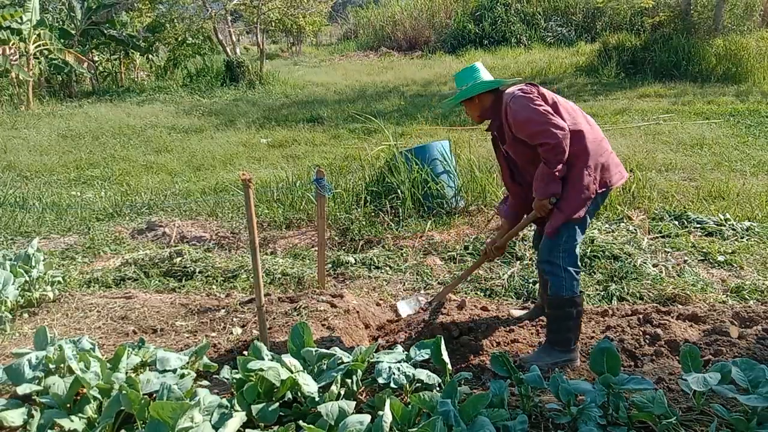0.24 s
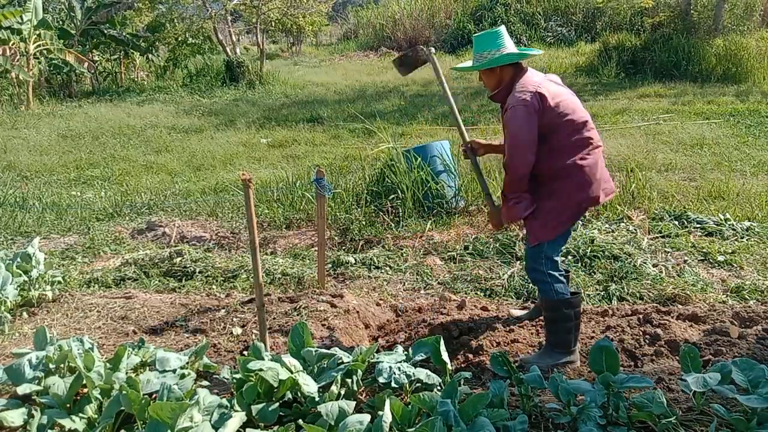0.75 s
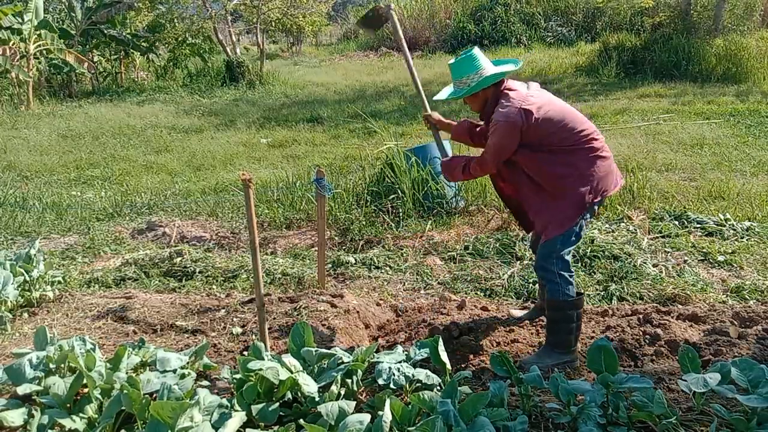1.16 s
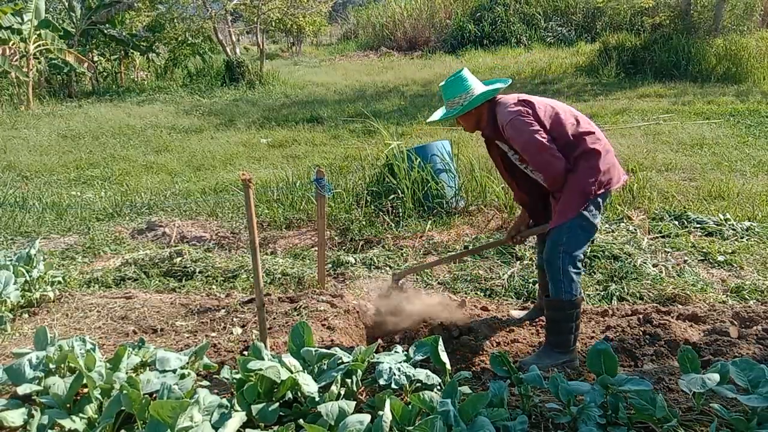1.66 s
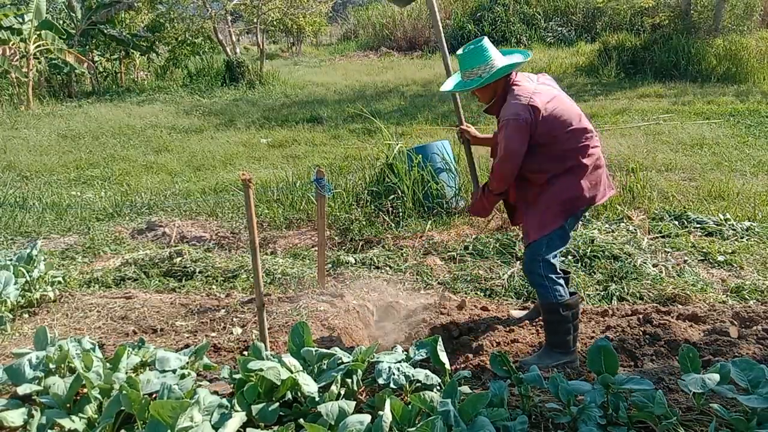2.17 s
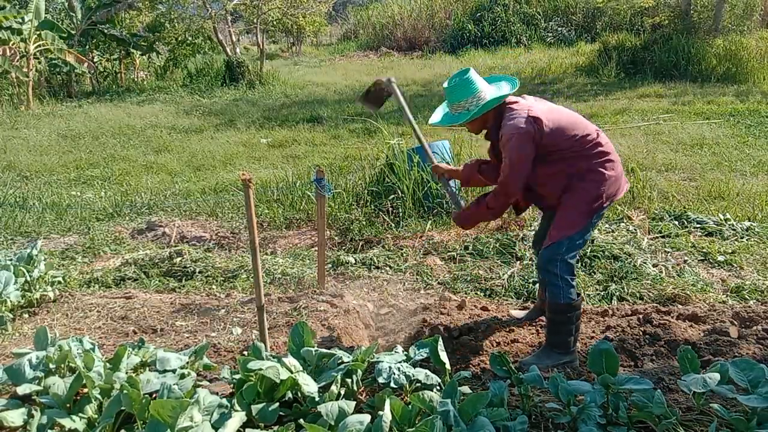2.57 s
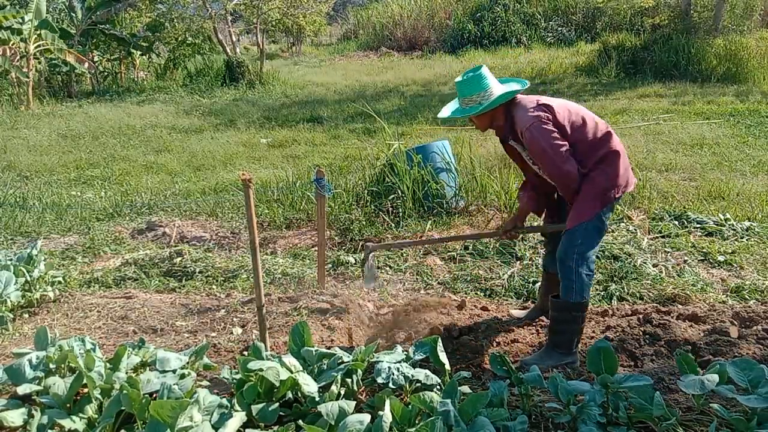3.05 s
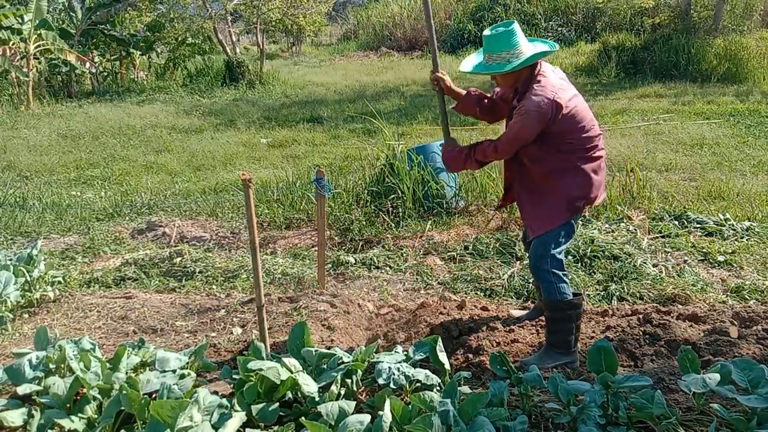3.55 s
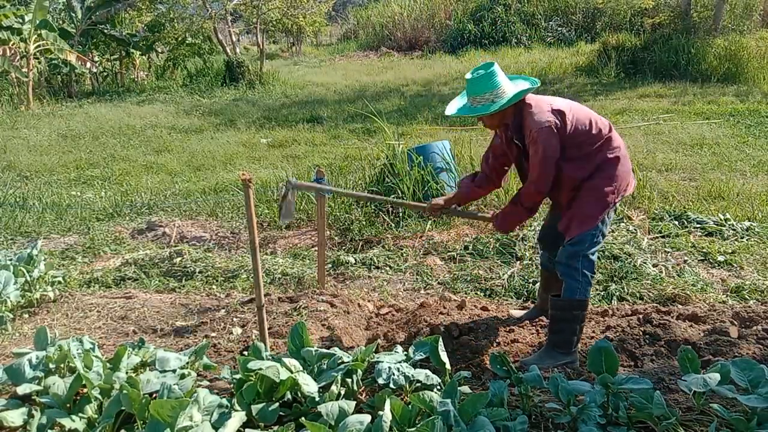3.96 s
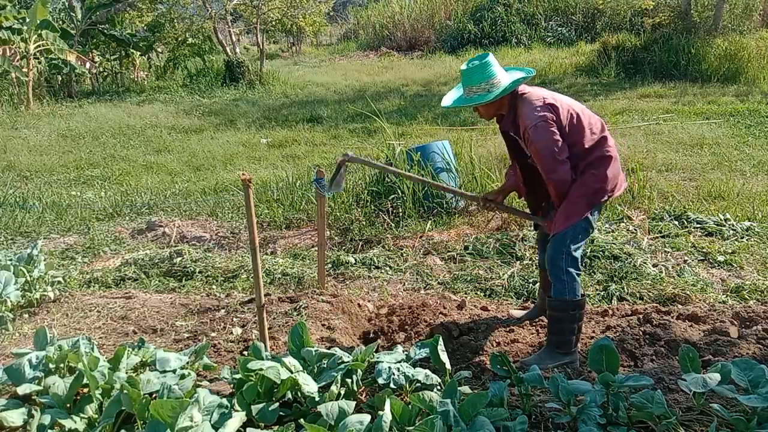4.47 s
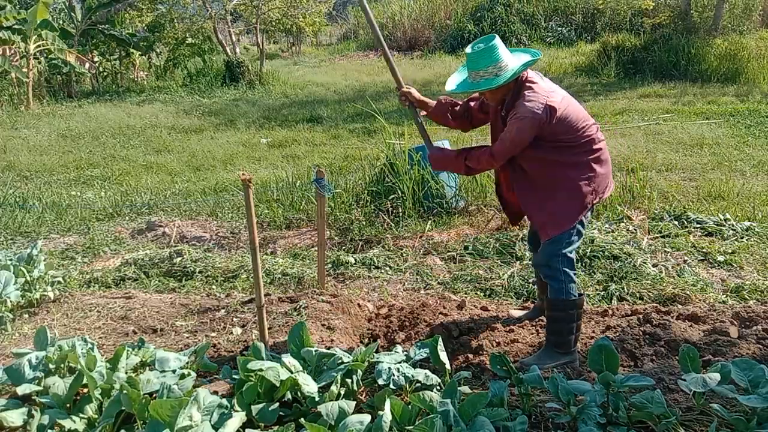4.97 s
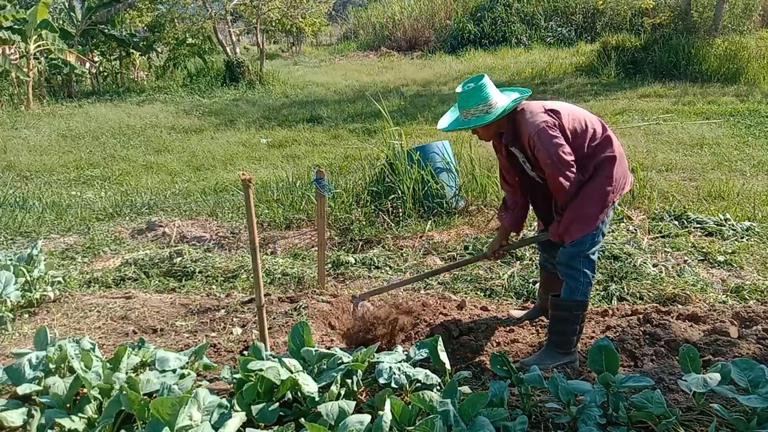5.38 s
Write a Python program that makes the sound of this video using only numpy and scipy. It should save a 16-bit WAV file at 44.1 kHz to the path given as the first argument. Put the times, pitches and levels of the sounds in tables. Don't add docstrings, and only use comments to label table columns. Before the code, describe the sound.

Wind buffets and leaf hiss open the scene, with a thin high insect hiss and distant droning engine that soon fade. Then a metal hoe bites dry earth: a dull chop, a sharp ringing one, and two crisp, gritty ones, each followed by trickling soil. A far pump whines unsteadily and a sprinkler spits. The open-air microphone stands several metres off, its background level pulsing with automatic gain.

```python
import sys
import numpy as np
from scipy import signal
from scipy.fft import rfft, irfft, next_fast_len
from scipy.io import wavfile
from scipy.ndimage import uniform_filter1d

SR = 44100
rng = np.random.default_rng(int(sys.argv[2]) if len(sys.argv) > 2 else 0)


def unload_audio(sound):
    columns = np.transpose(np.atleast_2d(sound))
    steps = np.round(np.clip(columns, -1, 1) * 32767)
    wavfile.write(sys.argv[1], SR, steps.astype(np.int16))


def to_linear_factor(level_db):
    exponent = np.asarray(level_db, float) / 20
    return 10 ** exponent


N = 247842
T = np.arange(N) / SR
COARSE = T[::32]
PIVOT_DB = -62

# pitch_hz, level_db
INSECT_COLOUR = [(13300, -19), (14300, -9), (15000, -5), (16000, -7)]
TRAFFIC_COLOUR = [(230, -25), (420, -11), (700, 0), (1000, -1.5), (1300, -11)]
PUMP_SKIRT_COLOUR = [(900, -29), (1080, 12.5), (1250, 6), (1500, -8), (1700, -18.5)]
# pitch_hz, level_db
LOW_LEAVES_COLOUR = [(900, -20.5), (1300, -3.5), (1650, -4.5), (2100, -4), (2700, -5), (3300, -12.5),
                     (3900, -27)]
HIGH_LEAVES_COLOUR = [(2900, -18), (3600, -4), (4600, -4.5), (5600, -4.5), (6200, -16), (6900, -31)]
RUSTLE_COLOUR = [(5500, -15), (6900, 0.5), (8200, -8), (10300, -7.5), (13400, -12.5), (14500, -9),
                 (16000, -1.5)]
RASP_COLOUR = [(1050, -21), (1300, -4), (1550, 2), (1800, -3.5), (2100, -24.5)]
# pitch_hz, level_db
RUMBLE_COLOUR = [(12, -50), (20, -33.5), (65, 6.5), (141, -3), (248, -21.5), (325, -32.5), (352, -26),
                 (403, -23.5), (500, -34.5), (650, -68.5), (1100, -120)]
GROWL_COLOUR = [(130, -20.5), (200, 1.5), (300, -5), (420, -16), (600, -31.5)]
# pitch_hz, level_db
SLIDE_COLOUR = [(600, -23.5), (900, -4.5), (1600, 0.5), (2500, -0.5), (3300, -7.5), (4200, -26.5)]
CRUMB_COLOUR = [(180, -37), (300, -4.5), (876, -15), (1230, -3), (1460, -1.5), (3810, -0.5), (4310, -6.5),
                (5910, -8), (8000, -26), (10400, -56.5), (17600, -120)]
SAND_COLOUR = [(5500, -18), (7000, 15.5), (8200, 6.5), (10300, 6.5), (13300, -7), (14700, 2.5),
               (16000, -4.5)]

# time_s, level_db
BREEZE = [(0.0, -57), (0.47, -53), (0.83, -62), (1.49, -64), (1.97, -68.5), (2.55, -67), (2.8, -67),
          (3.22, -69.5), (4.33, -70), (4.43, -64.5), (4.65, -71.5), (4.84, -68.5), (5.31, -69.5),
          (5.62, -65.5)]
# time_s, level_db
CARRY = [(0, -55.5), (.13, -54), (.42, -59.5), (.7, -62), (1.02, -63.5), (1.45, -60), (1.6, -60),
         (1.95, -51), (2.45, -57), (2.75, -50), (3.25, -59.5), (3.7, -54.5), (3.88, -61), (3.95, -68.5),
         (4.4, -62), (4.5, -62), (4.68, -66), (5.62, -69)]
# time_s, change_db, half_width_ms
PUMP_SWELLS = [(.12, 5, 27), (.28, 6.5, 54), (.41, 12.5, 29), (.62, 4.5, 43), (1.62, 6, 74), (1.83, 1, 50),
               (2.0, 1, 28), (2.15, 4.5, 81), (2.31, 5, 35), (2.52, 3, 33), (2.66, 4.5, 54),
               (2.99, -10, 27), (3.16, 6, 79), (3.26, -8, 25), (3.36, 7, 36), (3.5, 4, 100), (3.62, -9, 19),
               (3.7, 5.5, 40), (3.86, 7.5, 60), (4.021, 4.5, 43), (4.3, 3, 25), (4.7, 4.5, 50),
               (4.999, 0, 81), (5.32, 2, 30)]
# time_s, level_db
ENGINE_LEVEL = [
    (0, -82),
    (.3, -76),
    (.45, -71.5),
    (1.0, -71.5),
    (1.2, -78),
    (1.6, -86),
    (2.2, -82),
    (2.6, -87),
    (5.62, -92),
]
# pitch_hz, level_db
ENGINE_TONES = [
    (183, -3),
    (366, 8.5),
    (403, 8),
    (438, 3.5),
]
# time_s, level_db
SPURTS = [(.95, -57.5), (1.109, -55.5), (1.276, -54.5), (1.44, -61.5), (1.605, -68), (1.77, -65),
          (1.934, -57.5), (2.105, -66), (2.27, -63), (2.435, -68), (2.605, -61), (3.11, -66),
          (3.445, -63.5), (3.605, -62), (3.779, -59.5), (3.94, -64.5), (4.275, -65), (4.445, -63),
          (4.774, -62.5), (4.945, -66), (5.108, -66.5), (5.6, -62.5)]
# start_s, length_s, level_db
GUSTS = [(0, 0.099, -45.5), (0.1, 0.38, -43), (0.472, 0.14, -45), (0.671, .13, -46), (0.838, 0.033, -36),
         (0.924, 0.1, -40), (1.046, 0.14, -55), (1.146, 0.25, -37), (1.302, 0.22, -35), (1.55, 0.14, -35.5),
         (1.718, .18, -42), (1.965, 0.1, -47), (2.204, 0.043, -38), (2.279, 0.078, -45), (2.445, 0.11, -47),
         (2.567, 0.1, -41), (2.787, 0.13, -43.5), (3.096, 0.25, -43.5), (3.19, 0.1, -30.5),
         (3.306, 0.28, -27), (3.637, 0.14, -32.5), (3.77, .12, -42.5), (3.883, 0.074, -54),
         (4.104, 0.11, -36.5), (4.298, 0.048, -47), (4.363, 0.16, -45.5), (4.673, 0.23, -48),
         (4.917, 0.34, -44), (5.336, 0.27, -47), (5.517, .1, -44)]
# time_s, peak_db, pitch_hz, length_ms
BUFFETS = [(0.016, -28.5, 158, 5.2), (0.127, -38, 129, 8.5), (0.15, -30, 140, 2.4), (0.171, -18.5, 135, 6),
           (0.172, -25.5, 307, 4.9), (0.222, -37, 120, 11), (0.298, -35, 200, 2.9), (0.338, -29.5, 127, 5),
           (0.359, -29.5, 127, 24), (0.555, -32.5, 115, 9.4), (0.854, -25.5, 111, 7.3),
           (1.158, -19.5, 135, 3), (1.222, -27.5, 165, 4.1), (1.242, -30, 121, 4.7), (1.305, -35, 139, 3),
           (1.35, -29.5, 150, 4), (1.385, -28, 129, 13), (1.461, -27.5, 144, 5.6), (1.522, -34, 130, 5.2),
           (1.58, -47, 109, 9.1), (1.607, -31.5, 165, 4.1), (1.631, -25, 178, 3.6), (1.738, -21, 150, 6.9),
           (1.742, -36, 288, 5.7), (2.035, -23, 116, 4), (2.309, -36, 107, 5.7), (2.626, -28.5, 96, 23),
           (3.03, -58, 297, 16), (3.137, -37, 150, 7.4), (3.155, -33.5, 160, 5.3), (3.208, -25.5, 191, 3.2),
           (3.218, -23.5, 112, 15), (3.24, -32, 150, 3.5), (3.319, -18.5, 243, 1.76),
           (3.327, -26, 140, 5.5), (3.357, -18, 130.5, 12.5), (3.378, -25, 250, 1.8), (3.42, -31, 150, 5.5),
           (3.428, -18, 188, 5), (3.445, -34, 197.6, 6.1), (3.463, -14, 149, 4.5), (3.478, -15.5, 157, 2.9),
           (3.507, -22, 156, 8.5), (3.535, -27.5, 157, 9), (3.649, -25, 170, 3.1), (3.666, -19.5, 107, 8.9),
           (3.726, -28.5, 109.5, 15.4), (4.194, -30, 130, 5.7), (4.208, -32.5, 126, 4),
           (4.428, -26.5, 115, 3.8), (4.455, -32, 98, 11), (4.81, -33.5, 112, 9)]
# start_s, level_db, fade_ms
SLIDES = [(1.569, -52, 34), (1.663, -52.5, 35), (1.735, -52.5, 17), (1.784, -54, 66), (1.85, -57, 20),
          (1.904, -58, 26), (2.239, -55, 32), (2.631, -65, 49), (3.089, -58.5, 60), (3.671, -59, 40),
          (3.761, -66, 51), (4.368, -59.5, 140), (4.66, -68, 300), (5.5, -72, 50)]
# start_s, crumbs_db, crumbs_t60_s, sand_db, singing_blade_db
CHOPS = [
    (1.481, -34.5, 0.13, -42, -77),
    (2.807, -35.5, 0.24, -32, -42),
    (4.1142, -34, 0.22, -35, -68),
    (5.352, -38.5, 0.3, -37, -47),
]
# start_s, level_db, rise_s
THUDS = [
    (1.481, -36.5, 0.0085),
    (2.811, -34, 0.0072),
    (4.123, -37.5, 0.013),
    (5.357, -37, 0.0097),
]
BLADE_HZ = [890, 1255, 1870, 2632, 3490, 3818, 4830, 5005, 5750, 5975, 6560, 7280, 10310, 14630]
# level_db, t60_s
BLADE_RING = [(-17.5, 0.0054), (3, 0.028), (-6, 0.027), (-4, 0.043), (-8, 0.03), (1.5, 0.029), (0, 0.018),
              (-12.5, .035), (-4, 0.02), (-10, 0.047), (-5.5, 0.034), (-24.5, 0.049), (-7.5, 0.032),
              (-13, .03)]
# start_s, peak_db, brightness_hz, decay_ms, ring_db
CONTACTS = [(1.4828, -22.5, 1410, 8.7, 0), (1.4852, -25.5, 4450, 7.5, -19), (1.4868, -25, 2660, 1.2, -20),
            (1.4902, -26.5, 2340, 1.1, -20), (1.4965, -26, 1280, 2.6, -17), (1.5025, -31, 2590, 2.5, -21),
            (1.5075, -33, 910, 3.5, -41), (1.519, -40, 2670, 3, -13), (1.571, -42.5, 1280, 5, -2),
            (1.5715, -55, 2700, 4, -12), (2.8079, -1.5, 3300, 2.6, 6), (2.8111, -7.5, 2980, 2.2, 8.5),
            (2.8175, -21, 5700, 1.3, -22), (2.8275, -25, 940, 2.8, -25), (2.831, -31, 1820, 2.3, -11),
            (2.837, -26, 2530, 1.7, -13), (2.841, -28, 5880, 4, 11), (2.8495, -28, 3800, 2.2, -2),
            (2.863, -39, 4800, 3.2, 5), (2.926, -39, 2630, 5, 10), (4.1132, -22, 6600, 1.9, -16.5),
            (4.1157, -11, 5600, 0.4, -20), (4.1178, -29.5, 3430, 1.5, -9), (4.1205, -27.5, 3500, 2.4, 11),
            (4.125, -31, 5000, 1.5, -10), (4.1305, -18.5, 3900, 1, -12), (4.132, -21, 2860, 0.67, -2),
            (4.1362, -17, 3860, 0.81, 8), (4.137, -25, 2100, 1.9, 3), (4.1402, -23.5, 4300, 1.3, -18),
            (4.1425, -34, 2900, 1.1, -22), (5.3518, -8.5, 6600, 1.2, -8.5), (5.3526, -20, 5790, 1.13, -32),
            (5.3555, -24, 3000, 2.8, -5), (5.36, -36, 6300, 1.2, -20), (5.3652, -18, 2880, 2, -16),
            (5.366, -23, 7000, 1.2, -20), (5.372, -26, 2110, 1.5, -19), (5.3741, -15, 3800, 0.68, 0),
            (5.377, -23.5, 2100, 2.1, -13)]
# time_s, depth_db, half_width_ms
DUCKS = [(0.016, -4.5, 15), (0.182, -7.5, 22), (0.359, -9.5, 11.4), (0.524, -6, 12), (0.691, -5.5, 13),
         (0.853, -5.5, 23), (1.022, -5, 12), (1.182, -6.5, 6.2), (1.338, -3.5, 13), (1.74, -3.5, 21),
         (2.074, -9, 21.4), (2.234, -4, 15), (2.404, -11.5, 15.6), (2.6, -3, 30), (2.739, -7, 9.8),
         (3.079, -2, 21), (3.26, -1, 16), (3.429, -3, 28), (3.62, -2, 68), (4.482, -7, 7.1),
         (4.53, -6.5, 96), (5.29, -4, 23)]
# pitch_hz, width_hz, level_db
HOUSING = [
    (8070, 390, -9.5),
    (13700, 870, -2),
    (14900, 1600, 3),
]


def curve(table):
    return np.interp(T, *np.transpose(table))


def fine(slow):
    return np.interp(T, COARSE, slow)


def follow(db, offset_db, slope):
    return PIVOT_DB + offset_db + slope * (db - PIVOT_DB)


def unit(x):
    return x / abs(x).max()


def add(out, s, x):
    i = int(s * SR)
    out[max(i, 0):i + len(x)] += x[max(-i, 0):N - i]


def walk(rate):
    k = int(SR / rate)
    steps = np.repeat(rng.standard_normal(N // k + 1), k)[:N]
    y = uniform_filter1d(uniform_filter1d(steps, k), k)
    return y / y.std()


def grains(scatter_db):
    return rng.standard_normal(N) * to_linear_factor(scatter_db * rng.exponential(size=N))


def colour(x, spectrum):
    hz, db = np.transpose(spectrum)
    size = next_fast_len(N, True)
    bins = np.maximum(np.arange(size // 2 + 1) * SR / size, 1)
    gain = to_linear_factor(np.interp(np.log(bins), np.log(hz), db, left=-90, right=-90))
    y = irfft(rfft(x, size) * gain, size)[:N]
    return y / y.std()


def patchy(spectrum, spread_db, bins=3, frames=4, scatter_db=0):
    cells = signal.stft(grains(scatter_db), nperseg=512)[2]
    field = rng.standard_normal(cells.shape)
    field = uniform_filter1d(uniform_filter1d(field, bins, axis=0), frames, axis=1)
    noise = signal.istft(cells * to_linear_factor(spread_db * field / field.std()), nperseg=512)[1][:N]
    return colour(noise, spectrum)


def ring(x, hz, t60):
    pole = np.exp(2j * np.pi * hz / SR - np.log(1000) / (t60 * SR))
    return signal.lfilter([1], [1, -pole], x + 0j).imag


def ducking():
    dips = 0
    for s, db, ms in DUCKS:
        side = np.where(COARSE > s, 1.3, .8)
        dips = dips + db * np.exp(-(1000 * (COARSE - s) / ms * side) ** 2)
    return fine(dips)


def insect():
    fade = np.clip((1.45 - T) / .25 + .5, 0, 1)
    return to_linear_factor(-72 + 2.1 * walk(12.4)) * fade * colour(rng.standard_normal(N), INSECT_COLOUR)


def traffic():
    return to_linear_factor(follow(curve(CARRY), offset_db=-5, slope=0.55)) * patchy(TRAFFIC_COLOUR, 4.1)


def engine():
    turned_s = np.cumsum(1 + 0.0032 * walk(4.4)) / SR
    tones = sum(to_linear_factor(db + 2.3 * walk(27)) * np.sin(2 * np.pi * hz * turned_s) for hz, db in ENGINE_TONES)
    return to_linear_factor(curve(ENGINE_LEVEL)) * tones


def pump():
    pitch_hz, width_hz = 1250, 130
    k = int(SR / width_hz)
    flutter = uniform_filter1d(uniform_filter1d(rng.standard_normal((2, N)), k), k)
    phase = 2 * np.pi * pitch_hz * np.cumsum(1 + 0.023 * walk(12)) / SR
    whine = flutter[0] * np.cos(phase) + flutter[1] * np.sin(phase)
    whine = whine / whine.std() + to_linear_factor(-9) * patchy(PUMP_SKIRT_COLOUR, 4.6)
    swell_db = fine(sum(db * np.exp(-(1000 * (COARSE - s) / ms) ** 2) for s, db, ms in PUMP_SWELLS))
    return to_linear_factor(curve(CARRY) - 0.5 + swell_db + 1.4 * ducking()) * whine


def leaves():
    breeze_db = curve(BREEZE)
    near = to_linear_factor(follow(breeze_db, offset_db=0.37, slope=0.94))
    far = to_linear_factor(follow(curve(CARRY), offset_db=-6.5, slope=0.71))
    out = np.hypot(near, far) * patchy(LOW_LEAVES_COLOUR, 4.5)
    throb_db = 2.4 * np.cos(2 * np.pi * 5.94 * (T - .1)) * np.clip((.9 - T) / 0.083, 0, 1)
    rasp_db = follow(breeze_db, offset_db=-8.5, slope=1.97)
    out += to_linear_factor(rasp_db + throb_db) * patchy(RASP_COLOUR, 4.5)
    out += to_linear_factor(breeze_db + throb_db + 1.2 * walk(20)) * patchy(HIGH_LEAVES_COLOUR, 3.5)
    rustle_db = follow(breeze_db, offset_db=-9, slope=0.69)
    rustle = to_linear_factor(rustle_db + throb_db - 1.0) + to_linear_factor(-83)
    return out + rustle * to_linear_factor(1.1 * walk(34)) * patchy(RUSTLE_COLOUR, 2.7)


def sprinkler():
    jet = patchy(HIGH_LEAVES_COLOUR, 4.0) + to_linear_factor(-8.5) * colour(rng.standard_normal(N), RUSTLE_COLOUR)
    spurt_ms = 16.7
    return jet * fine(sum(to_linear_factor(db) * np.exp(-(1000 * (COARSE - s) / spurt_ms) ** 2) for s, db in SPURTS))


def gusts():
    calm_db, edge_s, arch_db, peak_at = -62, 0.024, -5.5, 0.4
    power = to_linear_factor(2 * calm_db)
    for s, length, db in GUSTS:
        nearest_end = np.minimum(COARSE - s, s + length - COARSE)
        shape = np.clip(nearest_end / edge_s + .5, 0, 1) ** 2
        arch = (2 * ((COARSE - s) / length - peak_at)).clip(-1, 1) ** 2
        power = power + shape * to_linear_factor(2 * (db + arch_db * arch))
    return fine(10 * np.log10(power))


def small_eddies(wind_db):
    gap_s = .023
    slot = np.arange(int(N / SR / gap_s) - 1)
    loud, pitch, length = rng.standard_normal((len(slot), 3)).T
    place = (slot + rng.random(len(slot))) * gap_s
    peak_db = wind_db[(place * SR).astype(int)] + 0.5 + 2 * loud
    hz = 115 * np.exp(.17 * pitch)
    ms = 10 * np.exp(.55 * length - .3 * pitch)
    return np.transpose([place, peak_db, hz, ms])


def wind(under_db, ceiling_db):
    wind_db = gusts()
    rumble_db = np.minimum(wind_db, ceiling_db) + under_db + 5.4 * walk(28)
    out = to_linear_factor(rumble_db) * colour(rng.standard_normal(N), RUMBLE_COLOUR)
    growl_db = follow(wind_db, offset_db=-36, slope=1.664) + 5.1 * walk(45)
    out += to_linear_factor(growl_db) * colour(rng.standard_normal(N), GROWL_COLOUR)
    t = np.arange(-2048, 2048) / SR
    hits = np.vstack([BUFFETS, small_eddies(wind_db)])
    for (s, db, hz, ms), (turn, edge) in zip(hits, rng.random((len(hits), 2))):
        swing = np.exp(-(1500 * t / ms) ** 2) * np.cos(2 * np.pi * (hz * t + turn))
        sharp = np.exp(-(2300 * t / ms) ** 2) * np.cos(2 * np.pi * (2.1 * hz * t + edge))
        add(out, s + t[0], to_linear_factor(db) * (swing + to_linear_factor(-19) * sharp))
    return out


def slides():
    fall = 0
    for s, db, ms in SLIDES:
        fall = fall + to_linear_factor(db) * (COARSE > s) * np.exp(-1000 * (COARSE - s).clip(0) / ms)
    return fine(fall) * to_linear_factor(2.5 * walk(74)) * patchy(SLIDE_COLOUR, 5.9, frames=2, scatter_db=2.5)


def singing_blade():
    singing = 0
    for hz, (db, _) in zip(BLADE_HZ[3:10], BLADE_RING[3:10]):
        singing = singing + to_linear_factor(.5 * db + 2.5 * walk(40)) * ring(grains(1.8), hz, .07)
    return singing / singing.std()


def soil():
    singing = singing_blade()
    crumbs = patchy(CRUMB_COLOUR, 1.7, frames=2, scatter_db=-1.0)
    sand = colour(grains(0.63), SAND_COLOUR)
    thud = colour(rng.standard_normal(N), [(120, -16.0), (250, 6), (400, -2.0), (700, -4.5), (1100, -21.5)])
    out = np.zeros(N)
    for (s, crumbs_db, t60, sand_db, sing_db), (thud_s, thud_db, rise) in zip(CHOPS, THUDS):
        age = np.maximum(T - s, 0)
        start = 1 - np.exp(-age / 0.00081)
        out += start * to_linear_factor(crumbs_db - 60 * age / t60 + 2.6 * walk(70)) * crumbs
        out += start * to_linear_factor(sand_db - 60 * age / (0.53 * t60) + 2.2 * walk(99)) * sand
        sing_fade = to_linear_factor(-60 * age / 0.4) + to_linear_factor(8.5 - 60 * age / 0.17)
        out += start * to_linear_factor(sing_db) * sing_fade * singing
        swell = np.maximum(T - thud_s, 0) / rise
        out += to_linear_factor(thud_db) * swell * np.exp(1 - swell) * thud
    return out


def crack(t, db, hz, ms):
    bite_s = .0003
    burst = rng.standard_normal(len(t)) * (1 - np.exp(-t / bite_s)) * np.exp(-1000 * t / ms)
    burst[int(bite_s * SR)] += 2.5
    broad_t60, narrow_t60 = 2.6 / hz, 21 / hz
    body = unit(ring(ring(burst, hz, broad_t60), hz, broad_t60))
    chip = unit(ring(burst, hz, narrow_t60))
    octaves = np.log2(hz / 3300)
    edge_db = -16.5 + .45 * max(db + 21, 0) + 18.5 * max(octaves, 0) + 16 * min(octaves, 0)
    edge = unit(signal.lfilter([1, -.6], [1, -0.11], burst))
    return body + to_linear_factor(-1.5) * chip + to_linear_factor(edge_db) * edge


def knock(t, hz, ms):
    tones = 0
    for mode_hz, (db, t60) in zip(BLADE_HZ, BLADE_RING):
        lot = rng.standard_normal()
        struck_db = db + 0.8 * lot - 6.7 * abs(np.log2(mode_hz / hz))
        fade_db = 60 * t / t60 / np.clip(ms / 3, .45, 1)
        tones = tones + to_linear_factor(struck_db - fade_db) * np.sin(2 * np.pi * mode_hz * t + 9 * lot)
    return tones * (1 - np.exp(-t / 0.0008))


def blade():
    out, t = np.zeros(N), np.arange(4096) / SR
    for s, db, hz, ms, ring_db in CONTACTS:
        sound = unit(crack(t, db, hz, ms)) + to_linear_factor(ring_db) * unit(knock(t, hz, ms))
        add(out, s, to_linear_factor(db) * unit(sound))
    return signal.sosfilt(signal.butter(2, 750, "high", fs=SR, output="sos"), out)


def scene():
    far = insect() + traffic() + engine() + pump()
    garden = leaves() + sprinkler() + wind(under_db=-2.5, ceiling_db=-45.5)
    hoe = slides() + soil() + blade()
    return (far + garden + hoe)[None]


def roll_off(x):
    return signal.sosfilt(signal.butter(12, 16860, fs=SR, output="sos"), x)


def record(dry):
    dry = signal.sosfilt(signal.butter(2, 60, "high", fs=SR, output="sos"), dry)
    for hz, width_hz, db in HOUSING:
        dry = dry + (to_linear_factor(db) - 1) * signal.lfilter(*signal.iirpeak(hz, hz / width_hz, SR), dry)
    dry = signal.sosfilt(signal.ellip(6, .5, 26, 15400, fs=SR, output="sos"), dry)
    dry = signal.sosfilt(signal.ellip(8, .5, 50, 16800, fs=SR, output="sos"), dry)
    return roll_off(dry * to_linear_factor(ducking()))


dry = scene()
out = record(dry)
unload_audio(out)
```